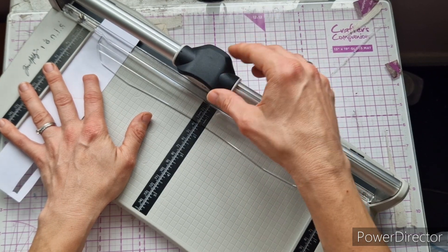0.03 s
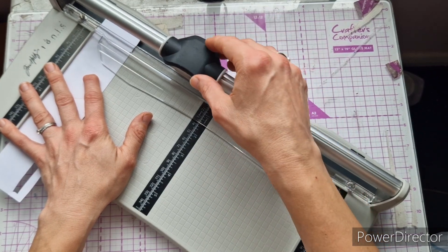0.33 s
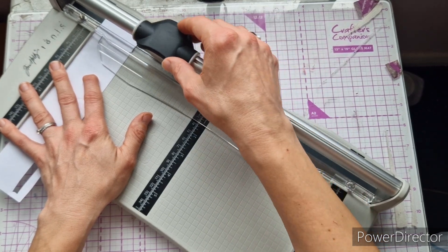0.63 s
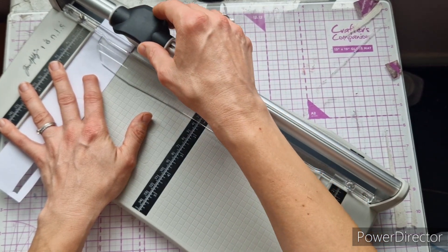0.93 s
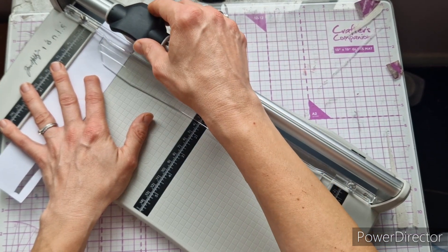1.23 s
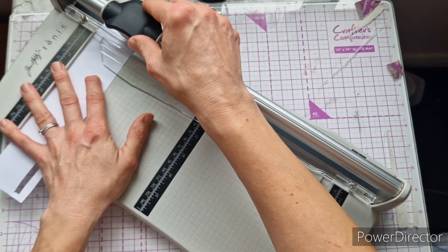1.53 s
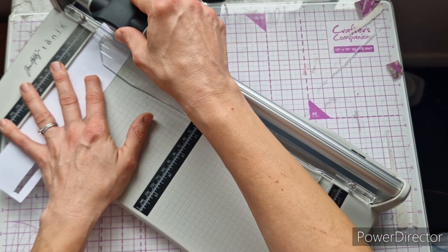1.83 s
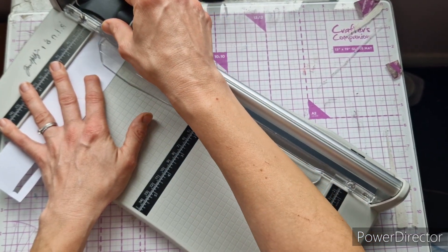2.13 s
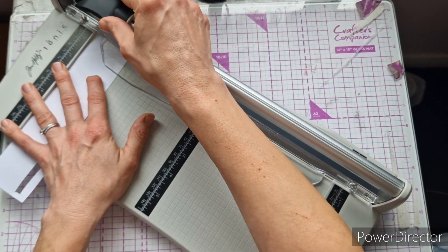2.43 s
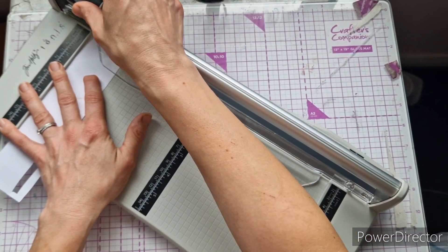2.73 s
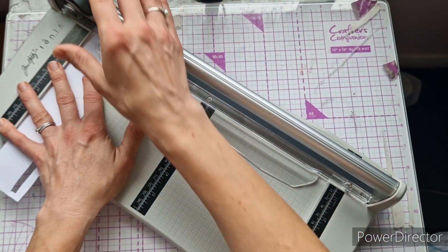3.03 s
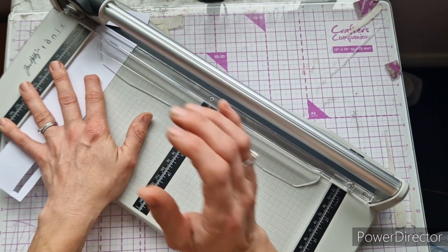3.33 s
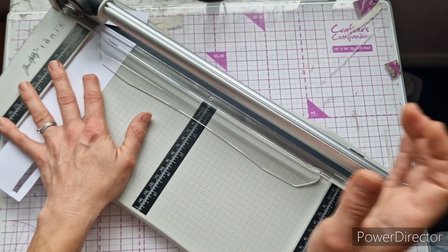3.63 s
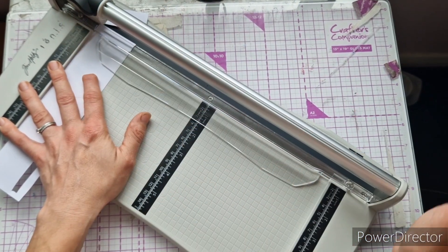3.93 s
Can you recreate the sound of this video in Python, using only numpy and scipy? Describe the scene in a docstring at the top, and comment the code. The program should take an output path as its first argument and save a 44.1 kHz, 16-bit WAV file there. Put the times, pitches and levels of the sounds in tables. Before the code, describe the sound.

A paper trimmer's head scrapes softly along its rail, rasps through card twice, then hits the end stop with a sharp clack.

```python
"""A soft knock and a dry scrape: the plastic head of a rotary paper trimmer slides along its rail.
Stick-slip friction rings the hollow head. Then the wheel bites into card, and snapping fibres
rasp and drive the resonances of the base board. The head strikes the end stop, the hand lets go
with a few light ticks, and a last dull knock falls on the desk, close by in a small, quiet room."""
import sys
import numpy as np
from scipy import signal
from scipy.fft import rfft, irfft
from scipy.io import wavfile
from scipy.ndimage import uniform_filter1d

SR = 44100
rng = np.random.default_rng(int(sys.argv[2]) if len(sys.argv) > 2 else 0)


def file_out(sig):
    """Save sig as 16-bit WAV at sys.argv[1]."""
    # one column per channel
    cols = np.atleast_2d(sig).T
    # limit, then scale
    lim = np.clip(cols, -1, 1)
    pcm = np.round(lim * 32767).astype(np.int16)
    wavfile.write(sys.argv[1], SR, pcm)


N = 176400
T = np.arange(N) / SR
FREQ = np.maximum(np.arange(N // 2 + 1) * SR / N, 1)
SIDES = np.array([[1], [-1]])  # left, right

# Spectral envelopes of the air, the desk and each contact: frequency_hz, gain_db
AIR_COLOUR = [(25, -8), (60, -3), (110, -6.5), (200, -2), (290, -15), (480, -23.5), (900, -27),
              (1700, -25.5), (3000, -30.5), (7000, -37), (10000, -47), (13000, -32.5), (15500, -44)]
DESK_COLOUR = [(20, -17.5), (50, -3), (70, -4.5), (120, -17), (250, -26), (600, -56.5)]
THUD_COLOUR = [(40, -16), (130, -7), (290, 0), (420, -12), (700, -40)]
FINGER_COLOUR = [(300, -27), (1500, -16), (3000, -7), (5200, 4), (7500, -7), (10000, -18), (13000, -11),
                 (15500, -24)]
FRAME_COLOUR = [(60, -34.5), (200, -24), (330, -9), (520, 4), (780, -5), (1120, -4), (2400, 5), (4500, 1),
                (6300, -1.5), (8500, -8), (12000, -6), (15500, -7)]
HEAD_COLOUR = [(100, -36.5), (290, -11.5), (480, -1.5), (650, 1.5), (1080, -9.5), (1900, 6.5), (2500, -4),
               (4000, -12), (7500, -20.5), (10000, -26), (12000, -23), (15500, -30.5)]
BOARD_COLOUR = [(30, -14.5), (65, -3), (120, -1), (190, -16), (290, -10), (400, -2), (600, 7.5),
                (950, -3.5), (1500, -2), (3500, -1), (7500, -6.5), (9700, -16), (12000, -12.5),
                (15500, -20)]
# Modes of the frame, head and base board: frequency_hz, bandwidth_hz, lift_db, left_minus_right_db
FRAME_RESONANCES = [(275, 35, 3.5, -3.5), (445, 35, 5, -1), (589, 72, 11.5, 6.5), (710, 19, 10.5, -2),
                    (973, 30, 13, 8), (1520, 50, 10, 6.5), (1670, 40, 9, 0), (1830, 40, 6.5, 0.5),
                    (2020, 45, 11, 3.5), (2260, 130, 3.5, -3), (2640, 60, 3, -4.5), (3760, 35, 9.5, -1.5),
                    (5700, 80, 4, -3.5), (6400, 90, 5, -8)]
HEAD_RESONANCES = [(505, 21, 10, -1.5), (584, 80, 16, -2.5), (685, 30, 9.5, -1.5), (830, 40, 10.5, 2.5),
                   (943.6, 33, 21.5, -1.5), (1256, 67, 13.5, 0.5), (1559, 32, 10.5, 0.5), (1826, 22, 14, 4),
                   (2055, 110, 7.5, 1), (3640, 90, -0.5, -1), (5500, 68, 4, -3), (5150, 670, 2, -1.5),
                   (7750, 660, 6.5, -4)]
BOARD_RESONANCES = [(350, 26, 13, 4.5), (435, 24, 7, -1), (560, 50, 5.5, 1.5), (630, 38, 20, -4),
                    (822, 22, 13, -4), (1262, 50, 6, 0.5), (1550, 52, 13.5, -3), (1668, 50, 8, 0),
                    (1830, 35, 0, -1.5), (2085, 75, 14, -1), (2345, 80, 10, 7), (2735, 23, 4, 12),
                    (3420, 38, 3.5, 13), (3755, 48, 7, 5), (4495, 46, 13.5, -6), (5220, 43, 2, -5.5),
                    (5620, 92, 6, -4.5), (6010, 170, -1, 11.5), (7400, 250, -1, 4)]
# The hand bumps the desk: centre_s, half_length_s, level_db
HAND_BUMPS = [(2.365, .022, -63), (3.998, .004, -45)]
# The fingers leave the head: start_s, level_db
FINGER_TICKS = [(2.945, -80), (3.0045, -54), (3.0455, -58), (3.112, -80), (3.226, -76), (3.824, -72)]
# Knocks on the trimmer's head and frame, then a last dull knock on the desk:
# start_s, level_db, rolloff_hz, rattle_s
KNOCK_EVENTS = [(.168, -55, 1200, .009), (1.094, -42, 1500, .009), (1.112, -49, 1000, .025),
                (2.69, -55, 6000, .005), (2.739, -22, 20000, .0045), (2.748, -32, 18000, .017),
                (2.862, -67, 2000, .008), (3.198, -63, 1800, .003), (3.995, -37, 1800, .004)]
# How hard the head bears on the rail: time_s, relative_level_db
RAIL_PRESSURE = [(0.22, -46), (0.404, -40), (0.428, -45), (0.566, -45), (0.648, -40), (0.676, -52),
                 (0.684, -45), (0.732, -57), (0.738, -52), (0.854, -45), (0.892, -60), (0.96, -50),
                 (1.064, -54), (1.085, -61)]
# Two tries and two full cuts: start_s, end_s, relative_force_db, rasp_db, rise_db_per_s
WHEEL_PUSHES = [(1.234, 1.279, -57.5, -64, 220), (1.448, 1.462, -52, -62, 0), (1.478, 2.208, -32, -40.8, 0),
                (2.443, 2.561, -33.5, -42, 75)]
# The wheel catches on tough spots in the card: centre_s, relative_level_db, half_length_s
WHEEL_CATCHES = [(1.279, -42.5, .008), (1.491, -29.5, .011), (1.545, -31.5, .006), (1.695, -28.5, .024),
                 (1.758, -29.5, .012), (1.88, -33, .012), (1.917, -30.5, .008), (2.068, -27, .007),
                 (2.089, -29, .01), (2.138, -27, .011), (2.198, -29.5, .014), (2.463, -25, .006),
                 (2.509, -22, .009), (2.545, -28, .012)]


def undb(db):
    """Amplitude grows tenfold for every 20 dB."""
    return 10 ** (np.asarray(db) / 20)


def unit(x):
    """Division by the rms gives a signal or spectrum unit mean power."""
    return x / np.sqrt(np.mean(np.abs(x) ** 2))


def below(hz):
    """A crossover passes this share of each frequency to its low side."""
    return 1 / (1 + (FREQ / hz) ** 6)


def stroke(start, end, attack_s, release_db_per_s, rise_db_per_s=0):
    """A driven vibration builds, holds or grows, then decays exponentially."""
    held = np.clip(T, start, end)
    attack = np.clip((T - start) / attack_s + .5, 0, 1)
    return attack * undb(rise_db_per_s * (held - start) - release_db_per_s * np.maximum(T - end, 0))


def swell(centre_s, half_s):
    """A Gaussian pulse rises smoothly to 1 and falls again."""
    return np.exp(-np.minimum(((T - centre_s) / half_s) ** 2, 50))


def wander(shape, span):
    """Averaging noise over a span of points leaves its slow fluctuations."""
    return unit(uniform_filter1d(uniform_filter1d(rng.standard_normal(shape), span), span))


def body(colour, modes=()):
    """Modes add Lorentzian peaks to a broad spectrum; minimum phase makes their ringing causal."""
    hz, db = np.transpose(colour)
    peaks = sum(undb(lift + SIDES * pan / 2) ** 2 / (1 + (2 * (FREQ - centre) / width) ** 2)
                for centre, width, lift, pan in modes)
    magnitude = undb(np.interp(np.log(FREQ), np.log(hz), db)) * np.sqrt(np.ones((2, 1)) + peaks)
    cepstrum = irfft(np.log(magnitude))
    cepstrum[:, 1:N // 2] *= 2
    cepstrum[:, N // 2 + 1:] = 0
    return np.exp(rfft(cepstrum))


def ring(force, response):
    """A linear system convolves its input with its impulse response."""
    lead = N // 400  # crossovers spread slightly ahead of the impulse
    impulse = np.roll(irfft(response), lead, axis=1)[:, :N // 10]
    return signal.fftconvolve(force, impulse, axes=1)[:, lead:lead + N]


def grains(per_s, spread_db, apart, flutter_hz, flutter_db):
    """Shot noise: tiny uneven impulses flutter in level and radiate differently to each side."""
    size = undb(spread_db * np.minimum(rng.exponential(size=N), 4))
    shared, own = rng.standard_normal(N), rng.standard_normal((2, N))
    impulses = (shared + apart * own) * size * (rng.random(N) < per_s / SR)
    return impulses * undb(flutter_db * wander(N, int(SR / flutter_hz)))


def blow(start_s, db, rattle_s, response, rattle=.25):
    """An impulse and a brief rattle excite free vibration; the level is its energy spread over 10 ms."""
    size = N // 20
    noise = unit(rng.standard_normal(size) + rng.standard_normal((2, size)) / 2)
    force = rattle * noise * np.exp(-T[:size] / rattle_s)
    force[:, 0] += 1
    hit = ring(force, response)
    rms = np.sqrt(np.mean(np.sum(hit ** 2, axis=1)) / (.01 * SR))
    return np.pad(undb(db) * hit / rms, ((0, 0), (int(start_s * SR), N)))[:, :N]


def coloured_noise(colour, side_db=-7):
    """Filtered white noise takes on the spectrum of its filter."""
    white = rng.standard_normal(N) + SIDES * undb(side_db) * rng.standard_normal(N)
    return unit(irfft(rfft(white) * body(colour)))


def background(air_db=-73, rest_db=-81, pan_db=-5):
    """Under steady room noise, the hand and wheel force the desk into low vibration."""
    air, desk, thud = map(coloured_noise, (AIR_COLOUR, DESK_COLOUR, THUD_COLOUR))
    shudder = undb(-57) * stroke(.37, .49, attack_s=.03, release_db_per_s=150)  # the hand leans
    tremble = undb(-64) * stroke(1.48, 2.8, attack_s=.05, release_db_per_s=9)  # the wheel is worked
    rumble = (undb(rest_db) + shudder + tremble) * desk * undb(SIDES * pan_db / 2)
    bumps = sum(undb(db) * swell(s, half) for s, half, db in HAND_BUMPS) * thud
    return undb(air_db) * air + bumps + rumble


def room(x, wet_db=-11, lag_s=.0001, scatter_rad=2, treble_pan_db=2.3, bass_pan_db=3.4):
    """Direct sound reaches the two sides with its own phase and level; reflections add a short tail."""
    low, middle = below(920), x.mean(axis=0)
    x = middle + irfft(rfft(x - middle) * (1 - low))  # only the treble stays wide
    # each small treble resonance differs in phase and strength between the sides
    twist, *ripple = wander((3, len(FREQ)), span=700)
    phase = 2 * np.pi * lag_s * FREQ + scatter_rad * (1 - below(1100)) * twist
    direct = np.exp(.5j * SIDES * phase) * undb(1.6 * (1 - below(3000)) * np.array(ripple))
    walls = rng.standard_normal((2, N)) * (T > .005)
    bass_tail, treble_tail = (unit(rfft(walls * undb(-60 * T / t60_s))) for t60_s in (.2, .19))
    tail = low / 2 * bass_tail + (1 - low) * treble_tail
    balance = undb(SIDES * (low * bass_pan_db + (1 - low) * treble_pan_db) / 2)
    return ring(x, balance * (direct + undb(wet_db) * tail))


def ticks(rattle_s=.00033):
    """Brief contacts have broad spectra: the fingers click brightly off the head."""
    response = body(FINGER_COLOUR)
    return sum(blow(s, db, rattle_s, response, rattle=.2) for s, db in FINGER_TICKS)


def knocks():
    """Knocks on the head and frame, and a last on the desk, excite modes; a softer contact is duller."""
    frame = body(FRAME_COLOUR, FRAME_RESONANCES)
    return sum(blow(s, db, rattle_s, frame / (1 + 1j * FREQ / rolloff_hz) ** 2)
               for s, db, rolloff_hz, rattle_s in KNOCK_EVENTS)


def slide(scrape_gain_db=1, slows_s=.8, slowing_db_per_s=30):
    """Stick-slip friction on the rail rings the hollow head; a fine hiss fades as the hand slows."""
    slips = grains(per_s=9000, spread_db=-.5, apart=.7, flutter_hz=110, flutter_db=1.5)
    head, low = body(HEAD_COLOUR, HEAD_RESONANCES), below(3300)
    # the head runs up to the card; past it, it gathers speed towards the end stop
    run = stroke(.212, 1.11, attack_s=.012, release_db_per_s=420)
    coast = stroke(2.57, 2.738, attack_s=.012, release_db_per_s=420, rise_db_per_s=35)
    pressure = undb(np.interp(T, *np.transpose(RAIL_PRESSURE)))
    scrape_gain = undb(scrape_gain_db) * (run * pressure + coast * undb(-62))
    hiss_gain = run * undb(-57 - slowing_db_per_s * np.maximum(T - slows_s, 0)) + coast * undb(-61.5)
    return scrape_gain * unit(ring(slips, head * low)) + hiss_gain * unit(ring(slips, head * (1 - low)))


def wheel_force(attack_s, release_db_per_s):
    """Superposition: the envelopes of the separate pushes add up to one drive on the board."""
    return sum(undb(db) * stroke(start, end, attack_s, release_db_per_s, rise)
               for start, end, db, _, rise in WHEEL_PUSHES)


def chatter(snaps, response, effort, board_db=-3, bass_db=1):
    """Forced vibration: the wheel drives the board, whose lowest modes build and fade more slowly."""
    drone = ring(snaps, response)
    power = np.maximum(uniform_filter1d(np.mean(drone ** 2, axis=0), size=400), 1e-12)
    drone = unit(drone / power ** .2)  # friction limits the swing
    bass = irfft(rfft(drone) * below(470))
    force = effort * undb(board_db) * wheel_force(attack_s=.004, release_db_per_s=620)
    bass_force = effort * undb(board_db + bass_db) * wheel_force(attack_s=.012, release_db_per_s=270)
    # a catch pumps the main resonance, not the lowest ones
    catch_power = sum(undb(db) ** 2 * swell(s, half) for s, db, half in WHEEL_CATCHES)
    return np.sqrt(force ** 2 + catch_power) * (drone - bass) + bass_force * bass


def cut(attack_s=.014, release_db_per_s=500, sizzle_db=-7):
    """Fracture: fibres snap under the wheel, rasping in the treble while the board chatters below."""
    snaps = grains(per_s=12000, spread_db=3.5, apart=.76, flutter_hz=330, flutter_db=.5)
    board, low = body(BOARD_COLOUR, BOARD_RESONANCES), below(1200)
    effort = undb(-3.5 * swell(1.95, half_s=.11))  # the hand eases off during the long cut
    # the rasp builds as the wheel sinks in
    rasp_gain = effort * sum(undb(db) * stroke(start + attack_s / 2, end, attack_s, release_db_per_s, rise)
                             for start, end, _, db, rise in WHEEL_PUSHES)
    rasp = rasp_gain * unit(ring(snaps, board * (1 - low)))
    # a harder cut is also a brighter one
    sizzle_gain = undb(sizzle_db) * rasp_gain.max() * (rasp_gain / rasp_gain.max()) ** 3
    sizzle = sizzle_gain * unit(ring(snaps, board * (1 - below(9200))))
    return chatter(snaps, board * low, effort) + rasp + sizzle


def scene():
    """Sound pressures add in the room; the ticks come from one small spot and stay sharp."""
    trimmer = room(slide() + cut() + knocks())
    fingers = room(ticks(), wet_db=-12, lag_s=0, scatter_rad=1, treble_pan_db=0)
    return trimmer + fingers + background()


def record(dry, top_hz=15800):
    """A steep elliptic low-pass filter limits the bandwidth."""
    return signal.sosfilt(signal.ellip(10, .2, 80, top_hz, fs=SR, output="sos"), dry)


dry = scene()
out = record(dry)
file_out(out)
```